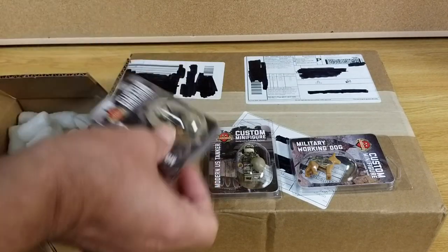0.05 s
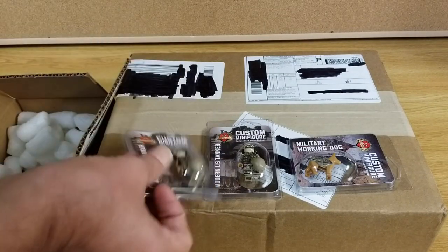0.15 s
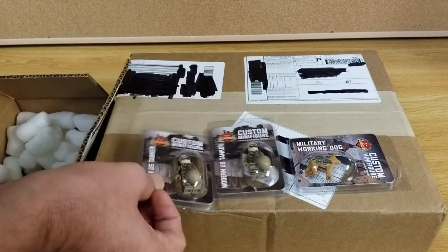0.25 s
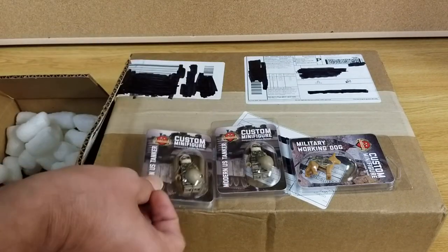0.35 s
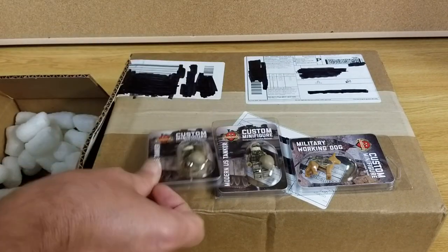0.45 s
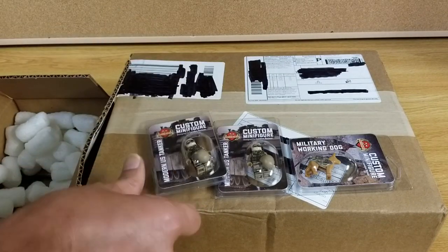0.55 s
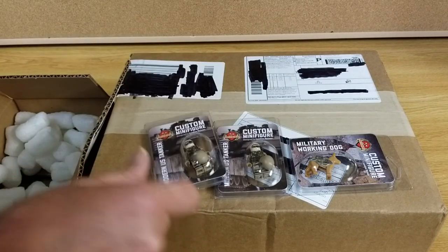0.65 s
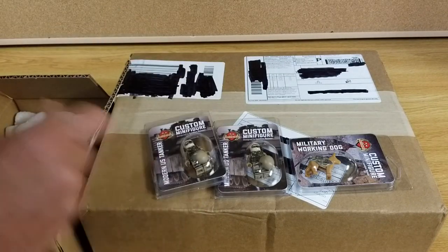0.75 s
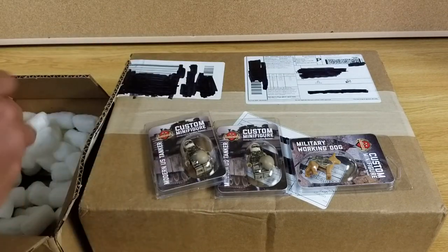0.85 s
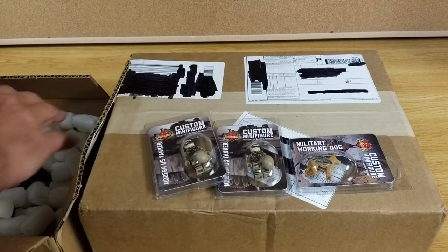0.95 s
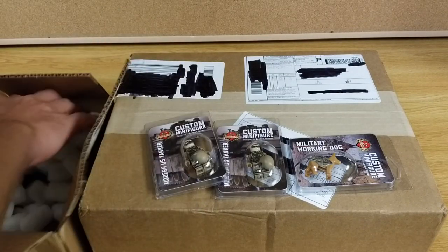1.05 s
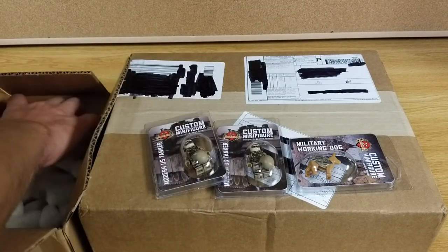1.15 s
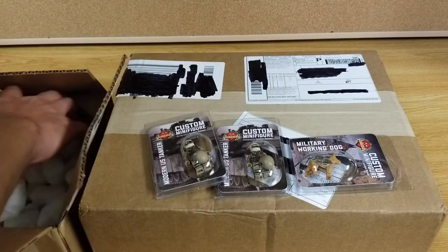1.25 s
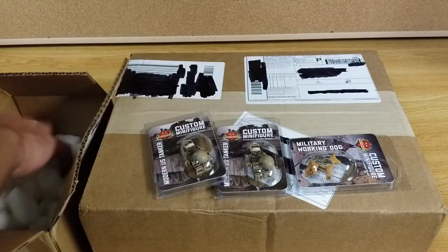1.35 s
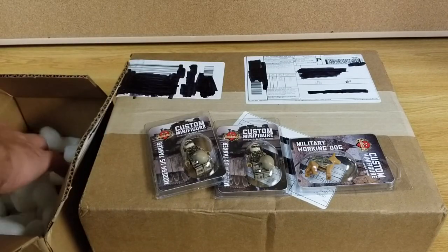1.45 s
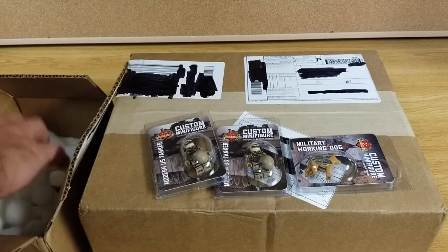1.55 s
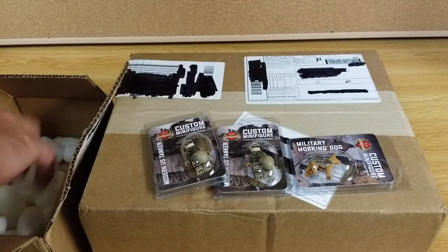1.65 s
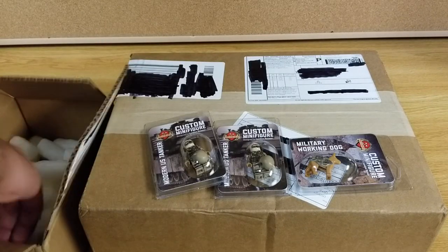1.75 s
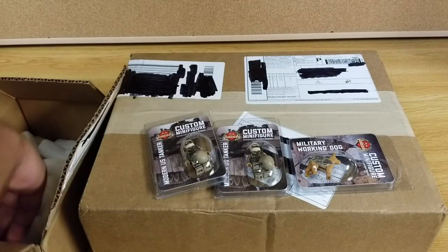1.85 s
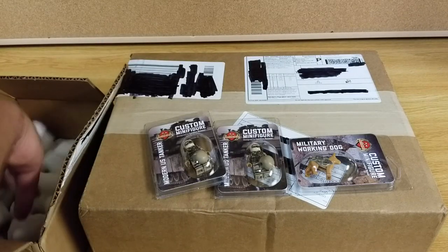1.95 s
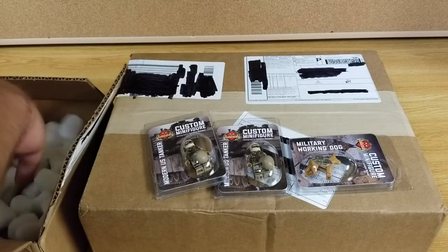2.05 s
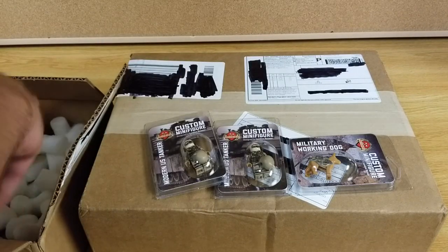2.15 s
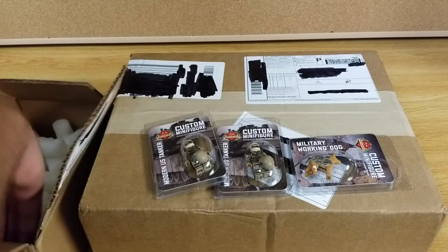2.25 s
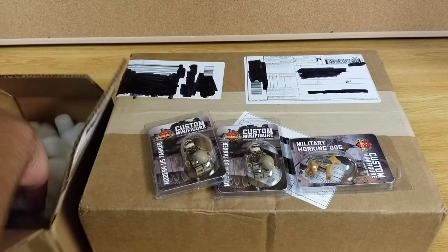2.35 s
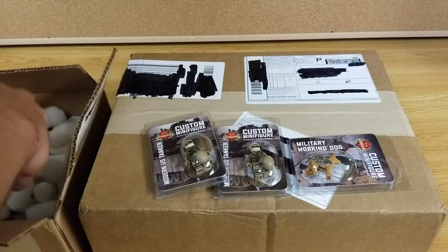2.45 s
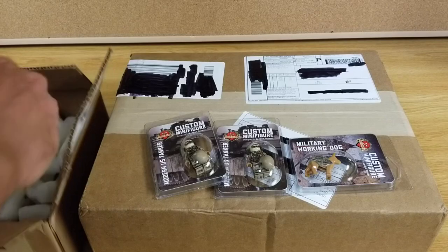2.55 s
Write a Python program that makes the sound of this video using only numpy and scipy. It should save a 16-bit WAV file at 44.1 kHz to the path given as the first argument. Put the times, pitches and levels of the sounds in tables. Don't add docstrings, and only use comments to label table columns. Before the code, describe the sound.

Handling of packaging: stiff plastic knocks on hollow cardboard, followed by three rustling digs in packing foam

```python
import sys
import numpy as np
from scipy import signal
from scipy.fft import rfft, irfft, next_fast_len
from scipy.io import wavfile

SR = 44100
rng = np.random.default_rng(int(sys.argv[2]) if len(sys.argv) > 2 else 0)


def natural_amplitude(level_db):
    exponent = np.asarray(level_db, float) / 20
    return 10 ** exponent


def inscribe(sig):
    pcm = np.round(np.clip(np.atleast_2d(sig).T, -1, 1) * 32767)
    wavfile.write(sys.argv[1], SR, pcm.astype(np.int16))


N = 116865


def rms_one(x):
    return x / np.sqrt(np.mean(x ** 2) + 1e-20)


def curves(rows):
    s, *columns = np.transpose(rows)
    return [np.interp(np.arange(N) / SR, s, c) for c in columns]


def moves(tables):
    rows = np.concatenate([np.array(rows, float) for rows in tables])
    s, level_db, *rest = rows[np.argsort(rows[:, 0])].T
    t = np.arange(N) / SR
    outside_s = np.maximum(s[0] - t, 0) + np.maximum(t - s[-1], 0)
    fade_db = 400 * outside_s
    return [np.interp(t, s, level_db) - fade_db] + [np.interp(t, s, c) for c in rest]


def drift(rate_hz):
    r = np.exp(-80 * np.pi * rate_hz / SR)
    white = rng.standard_normal(N // 40 + 2002)
    slow = signal.lfilter([1], [1, -2 * r, r * r], white)[2000:]
    return np.interp(np.arange(N) / 40, np.arange(len(slow)), rms_one(slow - slow.mean()))


def butter(x, order, hz, kind="low"):
    return signal.sosfilt(signal.butter(order, hz, kind, fs=SR, output="sos"), x)


def resonate(x, hz, width_hz):
    r = np.exp(-np.pi * width_hz / SR)
    gain = (1 - r * r) / 2
    return signal.lfilter([gain, 0, -gain], [1, -2 * r * np.cos(2 * np.pi * hz / SR), r * r], x + 1e-18)


def ring(x, hz, q):
    tone = resonate(resonate(x, hz, hz / q), hz, 2 * hz / q)
    return tone / abs(tone).max()


def colour(sources, spectrum, patchy_db, rate_hz):
    hz, db = np.transpose(spectrum)
    edges = 20 * 2 ** np.arange(0, 9.9, 1 / 3)
    out = 0
    for k, (low, high) in enumerate(zip(edges, edges[1:])):
        mid = np.sqrt(low * high)
        if hz[0] / 1.5 < mid < hz[-1] * 1.2:
            band = butter(sources[k % 2], 2, [low, high], "band")
            level_db = np.interp(np.log(mid), np.log(hz), db)
            out = out + band * natural_amplitude(level_db + patchy_db * drift(rate_hz))
    return rms_one(out)


def grains(per_s, spread_db, clump_db, smooth):
    born = rng.random(N) < per_s * natural_amplitude(clump_db * drift(40)) / SR
    sizes = born * natural_amplitude(spread_db * np.minimum(rng.exponential(1, N), 4))
    snaps = rms_one(sizes * rng.choice([-1, 1], (2, N)))
    return snaps + smooth * rng.standard_normal((2, N))


def cardboard(x, modes, widen):
    out = 0
    for k, (hz, width_hz, db) in enumerate(modes):
        out = out + (-1) ** k * natural_amplitude(db) * resonate(x, hz, widen * width_hz)
    return rms_one(out)


def knocks(rows, hold, crack_db):
    out = np.zeros(N + SR)
    t = np.arange(SR // 2) / SR
    strike = 0.64
    noises = rng.standard_normal((len(rows), SR // 2))
    for (s, db, hz, q, t60), noise in zip(rows, noises):
        flurry = noise ** 3 / 4 * natural_amplitude(-60 * np.maximum(t / t60 - hold, 0))
        flurry[0] += strike * np.sqrt(SR * q / hz)
        crack = noise * natural_amplitude(crack_db - 60 * t / 0.01)
        out[int(s * SR):][:len(t)] += natural_amplitude(db) * (ring(flurry, hz, q) + crack)
    return out[:N]


# time in seconds, lift of the floor in dB, depth of pumping as a factor.
GATE_MOVES = [(0, 3, 0.66), (.17, 4, .25), (.33, 3.5, 0.15), (.48, -2, .9), (.52, 7, 0.1), (.76, -1.5, 1),
              (.84, 1.5, 0.9), (.99, -2.5, 1.1), (1.02, 2.5, 1), (1.55, 4, 0.53), (1.7, -3.5, 0.87),
              (1.75, 0.5, 0.8), (2.05, 1.5, 0.87), (2.21, 3.5, 0.96), (2.65, 4.5, 0.3)]


def gate():
    return curves(GATE_MOVES)


# frequency in Hz, level in dB per Hz.
RUMBLE_SPECTRUM = [(20, -17), (35, -12), (65, 1.5), (125, -1), (280, -4.5), (520, -25), (700, -52)]
# frequency in Hz, level in dB per Hz.
AIR_SPECTRUM = [(500, -14.5), (900, -16.5), (1500, -7.5), (2400, -11), (3100, -11), (4200, -6.5),
                (5200, -6.5)]


def room_tone():
    rumble_db, air_db, air_gating = -51, -69.5, 2.55
    gate_db, _ = gate()
    rumble = butter(colour(rng.standard_normal((2, N)), RUMBLE_SPECTRUM, 1.0, 15), 4, 600)
    air = colour(rng.standard_normal((2, N)), AIR_SPECTRUM, 1.4, 13)
    return natural_amplitude(rumble_db + gate_db) * rumble + natural_amplitude(air_db + air_gating * gate_db) * air


# frequency in Hz, level in dB per Hz.
HISS_SPECTRUM = [(1760, -61), (3000, -63), (5140, 7.5), (6110, -3.5), (6720, -5), (8210, 2.5),
                 (15600, -7.5)]
# pitch in Hz, level in dB.
WHINE_TONES = [(5895, -78), (6315, -72), (8118, -77)]


def hiss():
    hiss_db, flutter_hz, flutter_start_s, flutter_db, wander_db = -58.5, 31.2, .925, 4.5, 2.2
    t = np.arange(N) / SR
    gate_db, pumping = gate()
    swing = np.sin(2 * np.pi * flutter_hz * (t - flutter_start_s))
    pump = np.tanh(3 * (swing + .4 * drift(60)))
    noise = colour(rng.standard_normal((2, N)), HISS_SPECTRUM, 1.3, 40)
    noise = butter(noise, 4, 4400, "high")
    whine = 0
    for hz, db in WHINE_TONES:
        tone = rms_one(resonate(rng.standard_normal(N), hz, 11))
        whine = whine + natural_amplitude(db + 1.5 * drift(5.6)) * tone
    flutter = pumping * (flutter_db * pump + wander_db * drift(27))
    return natural_amplitude(hiss_db + gate_db + flutter) * noise + whine


# time in seconds, boom level in dB.
LEANING = [(0, -47.5), (.14, -51.5), (.3, -34), (.49, -55.5), (.55, -43), (.69, -37), (.82, -48.5),
           (1.01, -51), (1.05, -29.5), (1.14, -53), (1.5, -45), (1.68, -58.5), (1.9, -45), (2.04, -54.5),
           (2.3, -43.5), (2.65, -56)]
# frequency in Hz, width in Hz, level in dB.
TABLE_MODES = [(105, 22, -9), (133.8, 20, -0.5)]


def table_boom():
    white = rng.standard_normal((2, N))
    level_db, = curves(LEANING)
    boom = 0
    for k, (hz, width_hz, db) in enumerate(TABLE_MODES):
        boom = boom + natural_amplitude(db) * rms_one(resonate(white[k], hz, width_hz))
    return natural_amplitude(level_db) * boom


# time in seconds, crackle level in dB.
PACK_MOVES = [
    [(.172, -67), (.182, -52), (.207, -49), (.211, -37), (.262, -39), (.278, -33.5), (.366, -52),
     (.448, -55), (.5, -47.5)],
    [(.51, -56), (.54, -43.5), (.546, -25), (.576, -37.5), (.62, -36), (.704, -46), (.745, -51), (.78, -87),
     (.86, -100)],
]
# frequency in Hz, level in dB per Hz.
PLASTIC_SPECTRUM = [(1300, -8), (1600, 0.5), (2200, -15.5), (3030, -9.5), (3650, -15.5), (4850, -15),
                    (7000, -22.5), (15500, -34)]
# frequency in Hz, width in Hz, level in dB.
LID_MODES = [(420, 18, 7), (577, 30, 4.5), (904, 150, -6.5), (1034, 65, -0.5), (1210, 39, 5),
             (1348, 17, 3.5), (1470, 69, -4), (1846, 45, -5)]


def pack():
    level_db, = moves(PACK_MOVES)
    crackle = colour(grains(1100, 3.4, 3, .7), PLASTIC_SPECTRUM, 2.2, 27)
    lid = cardboard(grains(1200, 0.81, 4.3, 0.96)[0], LID_MODES, 0.84)
    return natural_amplitude(level_db) * (crackle + lid)


# start in seconds, peak in dB, pitch in Hz, sharpness as Q.
TAP_HITS = [(.1805, -32, 9300, 6), (0.182, -35, 6500, 6), (.2105, -37, 900, 1.3), (.272, -40, 5100, 4),
            (.2735, -18.5, 556, 2.1), (.2805, -18.5, 563, 2.4), (.285, -23, 425, 4.4),
            (.292, -27.5, 422, 5.6), (.3, -25, 573, 3.9), (0.319, -43, 440, 3), (0.353, -38, 9500, 12),
            (0.544, -28.5, 8800, 5.9), (0.636, -31, 1047, 19), (0.646, -48, 1110, 5.9),
            (1.0385, -24, 520, 5.7), (1.04, -31, 8600, 5), (1.042, -21, 235, 2.6), (1.0494, -21, 490, 3.3),
            (1.06, -21.5, 292, 2), (1.064, -28, 606, 3.3), (1.069, -17.5, 294, 2.3), (1.083, -23, 370, 4.1),
            (1.099, -33, 334, 5.1), (1.102, -26, 830, 5.1), (1.107, -27, 764, 7.1), (1.115, -31, 795, 7),
            (1.141, -30.5, 790, 4.8), (.5425, -27, 770, 1.8), (.5455, -12.5, 990, 4),
            (.5465, -29, 2830, 6.7), (.552, -16, 705, 3), (.561, -21, 700, 3.9), (.686, -32.5, 140, 4.2),
            (1.225, -37, 138, 2.2), (1.795, -39, 806, 6), (1.81, -36, 760, 5.5), (2.2275, -31.5, 555, 3.4),
            (2.27, -35.5, 416, 3.5), (2.375, -31.5, 437, 3.8), (2.52, -40, 219, 2.9)]


def taps():
    out = np.zeros(N + SR)
    click = np.eye(1, SR // 8)[0]
    for s, db, hz, q in TAP_HITS:
        out[int(s * SR):][:len(click)] += natural_amplitude(db) * ring(click, hz, q)
    return out[:N]


# start in seconds, peak in dB, pitch in Hz, sharpness as Q, t60 in seconds.
PACK_CLICKS = [(.181, -31.5, 4300, 16, 0.045), (.183, -36.5, 1310, 1.1, 0.065), (.211, -41, 580, 0.81, 0.2),
               (.221, -32, 2960, 27, 0.069), (.252, -28, 3500, 2.6, 0.099), (.2735, -31, 620, 0.78, 0.053),
               (.274, -29, 1470, 7.1, 0.08), (.281, -26.5, 408, 2.4, 0.1), (.414, -41, 1110, 5.2, 0.047),
               (.49, -53, 2890, 22, 0.37), (.523, -40, 1670, 2, .05), (.544, -18, 675, 2.3, 0.13),
               (.546, -17.5, 1540, 4.2, 0.08), (.546, -25, 2950, 5.7, 0.24), (.548, -25.5, 292, 0.91, .3),
               (.545, -30.5, 74, 1.44, 0.073), (.56, -28, 1025, 11, 0.28), (.61, -29.5, 1040, 5.9, 0.18),
               (.684, -29, 410, 0.86, 0.042)]


def pack_clicks():
    return knocks(PACK_CLICKS, hold=0.038, crack_db=-29)


TICK_TIMES = [.378, 0.736, 0.786, 0.812, 0.855, .912, 0.943, 1.539, 1.561, 2.066]


def faint_ticks():
    ticks = np.full(N, 1e-18)
    ticks[(np.array(TICK_TIMES) * SR).astype(int)] += natural_amplitude(-33)
    return butter(ticks, 2, 4900)


# time in seconds, rustle level in dB, load on the walls in dB.
FOAM_DIGS = [
    [(1.016, -86, -11), (1.036, -54, -32), (1.042, -42.5, 8.5), (1.142, -39.5, 1.5), (1.186, -47, 3.5),
     (1.31, -42, -4.5), (1.35, -37, 2.5), (1.46, -49.5, 0.5), (1.71, -73, 18)],
    [(1.724, -61, 4), (1.756, -41.5, 2.5), (1.8, -43.5, -7), (1.845, -49, -10), (1.878, -35.5, -9),
     (1.94, -42.5, 0.5), (2.055, -60.5, 4.5), (2.078, -49.5, 6), (2.2, -65, -6)],
    [(2.222, -85, 17), (2.23, -46.5, 12), (2.322, -38, -3), (2.35, -37, -3), (2.438, -51, 2.5),
     (2.548, -47.5, -9), (2.575, -50.5, -15), (2.6, -49.5, -3), (2.65, -51, -10)],
]
# frequency in Hz, level in dB per Hz.
FOAM_SPECTRUM = [(530, -104), (900, -13.5), (1140, -24), (1420, -10), (2480, -12.5), (4940, -11.5),
                 (7860, -17), (8550, -15), (15500, -31.5)]
# frequency in Hz, width in Hz, level in dB.
WALL_MODES = [(324, 51, -1), (452, 47, -2.5), (580, 18, 2.5), (800, 116, -6), (1450, 83, -16.5)]


def foam():
    level_db, load_db = moves(FOAM_DIGS)
    rustle = colour(grains(3000, 3.3, 3, .75), FOAM_SPECTRUM, 0.84, 25.0)
    walls = cardboard(grains(1500, 5.6, 0.94, 0.19)[0], WALL_MODES, 2.0)
    return natural_amplitude(level_db) * (rustle + natural_amplitude(load_db) * walls)


# start in seconds, peak in dB, pitch in Hz, sharpness as Q, t60 in seconds.
WALL_BUMPS = [(1.385, -34, 786, 5, 0.1), (1.045, -29, 2100, 1.9, 0.64), (1.062, -30, 290, 5.3, 0.15),
              (2.1, -43, 1100, 13, 0.23), (1.24, -31.5, 810, 3.6, 0.32), (1.33, -26.5, 763, 3, 0.36),
              (1.487, -33, 1230, 4.3, 0.012), (1.58, -43.5, 544, 2.3, 0.89), (1.79, -32, 766, 2.2, 0.12),
              (1.877, -29.5, 640, 3.2, 0.14), (1.918, -29, 710, 2.3, 0.13), (2.073, -33, 960, 5.9, 0.21),
              (2.075, -37, 1310, 13, 0.2), (2.227, -30, 497, 2, 0.33), (2.332, -25, 816, 2.2, 0.33),
              (2.46, -39, 790, 5, 0.16), (2.589, -41.5, 314, 9.8, 0.4), (2.6, -40, 693, 4.1, 0.15),
              (1.539, -39.5, 734, 1.8, 0.015), (2.59, -42.5, 1730, 1.6, 0.19)]


def wall_bumps():
    return knocks(WALL_BUMPS, hold=0.081, crack_db=-38)


def room(x):
    size = next_fast_len(N + SR)
    hz = np.arange(size // 2 + 1) * SR / size
    t60 = 0.24 / (1 + hz / 6000)
    echo = 0
    for k, lag_s in enumerate(rng.uniform(.011, .04, 10)):
        loop = natural_amplitude(-60 * lag_s / t60) * np.exp(-2j * np.pi * hz * lag_s)
        echo = echo + (-1) ** k * loop / (1 - loop)
    return irfft(rfft(x, size) * echo, size)[:N]


def scene():
    near = pack() + taps() + pack_clicks() + faint_ticks() + foam() + wall_bumps()
    floor = room_tone() + hiss() + table_boom()
    return (near + natural_amplitude(-13) * room(near) + floor)[None]


def top_cut(x):
    return signal.sosfilt(signal.butter(12, 15840, fs=SR, output="sos"), x)


def record(dry):
    top_hz = 15810
    mix = signal.sosfilt(signal.ellip(12, .5, 70, top_hz, fs=SR, output="sos"), dry)
    return top_cut(mix)


dry = scene()
out = record(dry)
inscribe(out)
```